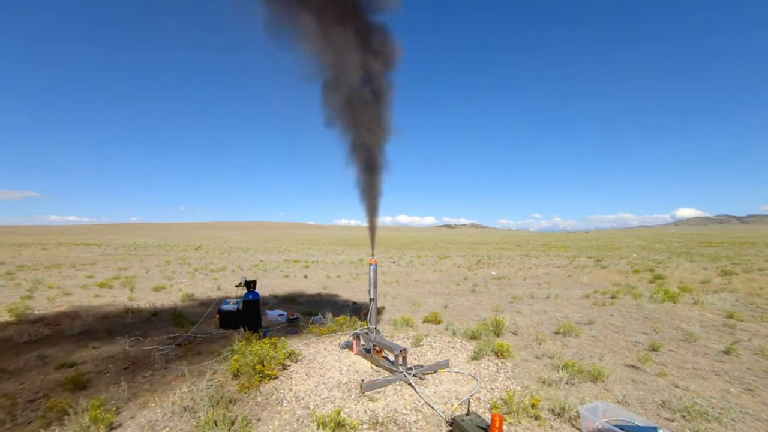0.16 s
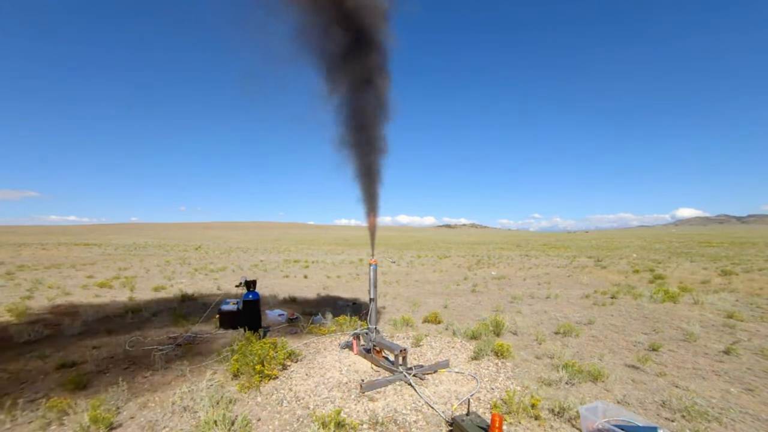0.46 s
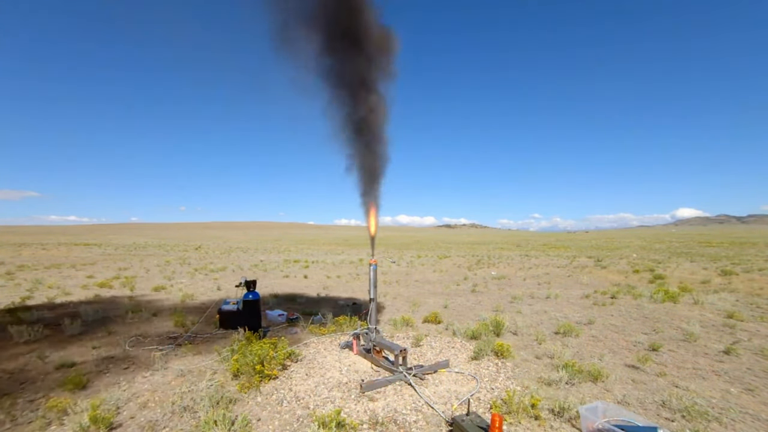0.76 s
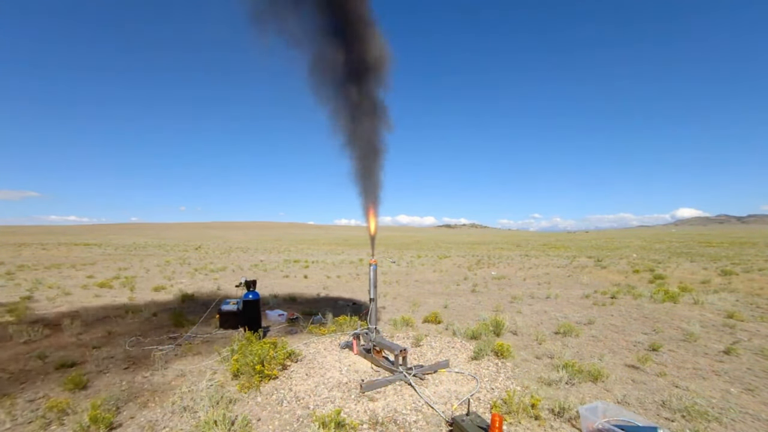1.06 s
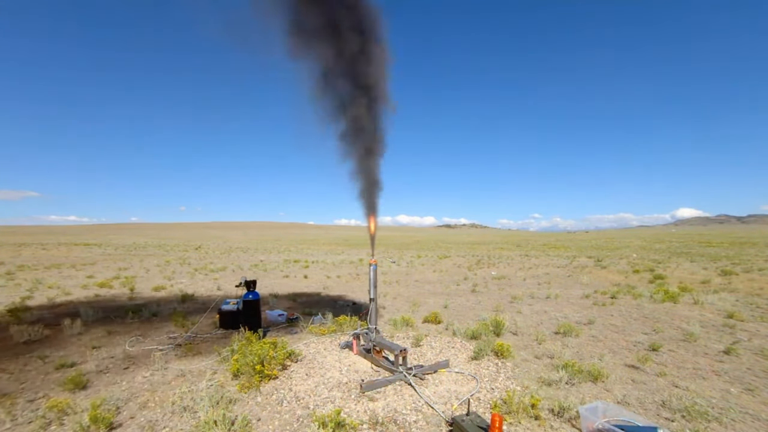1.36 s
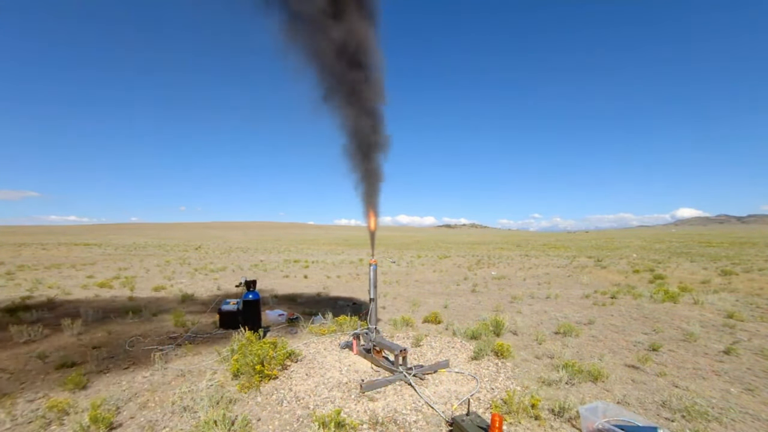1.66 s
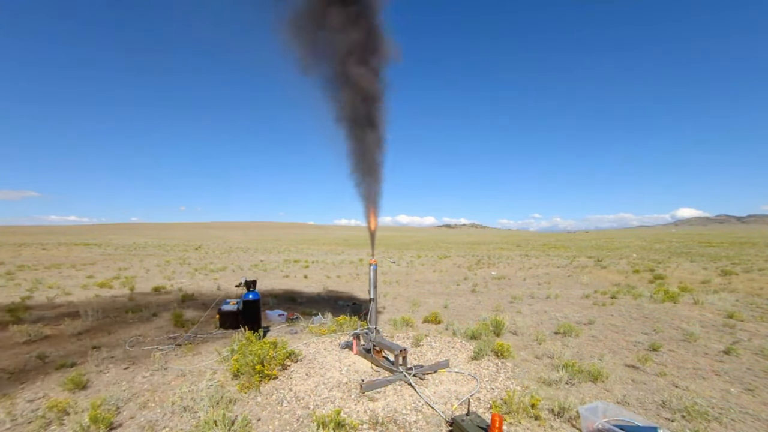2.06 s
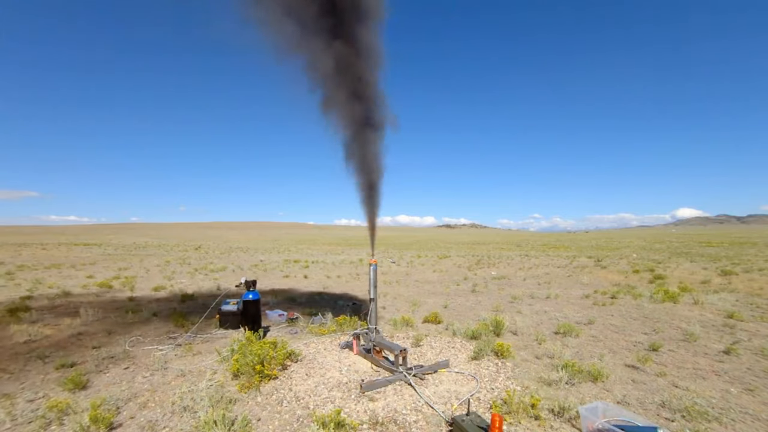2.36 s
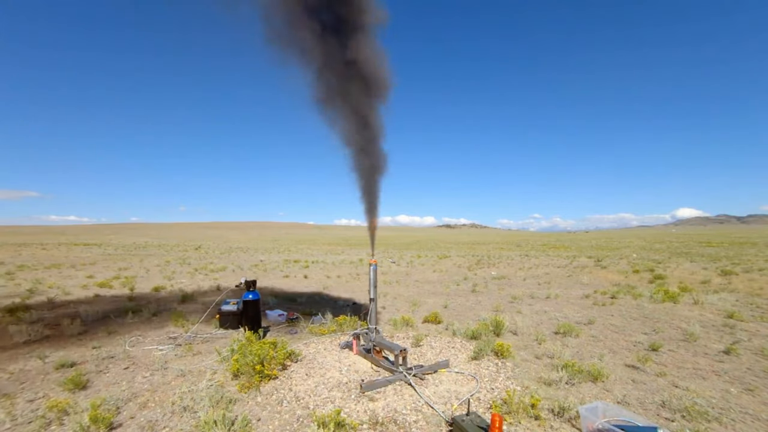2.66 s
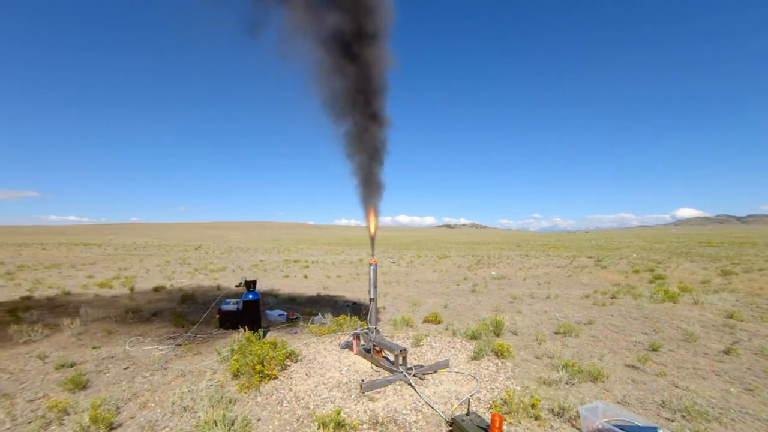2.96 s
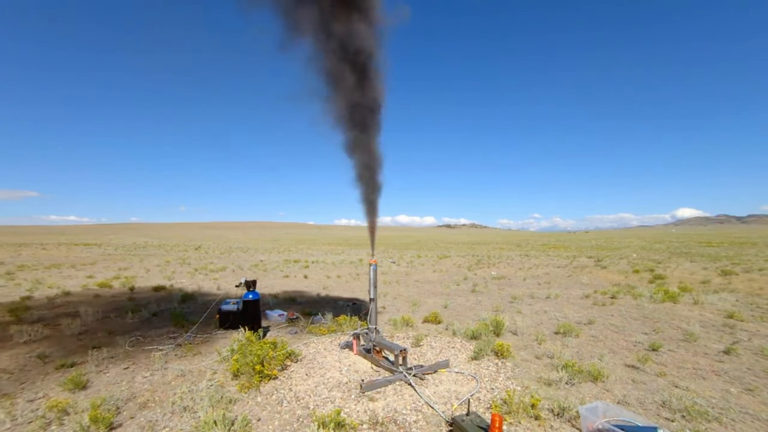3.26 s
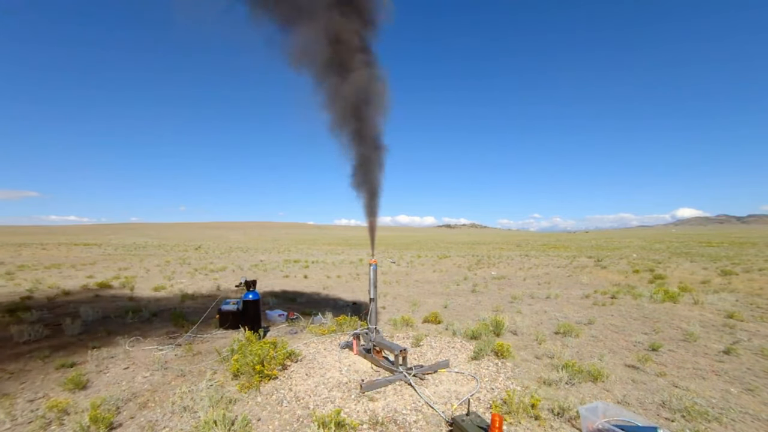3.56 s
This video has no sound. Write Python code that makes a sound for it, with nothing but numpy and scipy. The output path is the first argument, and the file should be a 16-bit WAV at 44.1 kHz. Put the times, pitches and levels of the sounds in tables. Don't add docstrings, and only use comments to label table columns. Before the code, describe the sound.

A small rocket motor sputters alight, then roars steadily with sharp cracks and a gassy hiss.

```python
import sys
import numpy as np
from scipy import signal
from scipy.fft import rfft, irfft, next_fast_len
from scipy.io import wavfile
from scipy.ndimage import uniform_filter1d, minimum_filter1d

SR = 44100
rng = np.random.default_rng(int(sys.argv[2]) if len(sys.argv) > 2 else 0)


def amplitude_ratio(level_db):
    exponent = np.asarray(level_db, float) / 20
    return 10 ** exponent


def store_pcm(level_fs):
    pcm = np.round(np.clip(level_fs, -1, 1) * 32767).astype(np.int16)
    wavfile.write(sys.argv[1], SR, np.atleast_2d(pcm).T)


N = 164052

# time in seconds, roar level in dB, sputter depth in dB, hiss level in dB.
BURN = [(0, -19.5, 8, -31), (0.031, -20.5, 9, -30.5), (0.044, -12.5, 4, -30), (.1, -16, 11, -23.5),
        (.155, -13, 10.5, -22.5), (0.172, -12.5, -7, -31.5), (.225, -14, -5, -26), (.26, -12.5, 1.5, -31),
        (.5, -13, 4, -33.5), (1.0, -13, 0, -30), (1.2, -12.5, 1, -29.5), (2.0, -12.5, 2.5, -30.5),
        (2.8, -13, 4, -29.5), (3.1, -13.5, -1, -32.5), (3.4, -13.5, 3, -30), (3.72, -13.5, 4.5, -28.5)]
# start in seconds, length in seconds, roar change in dB.
LULLS = [(.008, 0.017, -10), (.033, 0.0058, -46), (0.048, .1145, -17), (0.177, 0.0082, -22),
         (0.187, 0.042, -21.5), (0.231, .008, -19), (0.251, .006, -17), (.262, 0.016, -12),
         (.294, 0.0079, -20), (0.319, .007, -7), (0.347, 0.0099, -9), (0.36, 0.01, -14), (0.368, 0.015, -2),
         (0.401, 0.0065, -19), (0.427, 0.0038, 2), (0.449, 0.012, -21), (0.587, 0.0054, -10),
         (0.605, 0.0076, -28), (0.668, 0.012, -9), (.882, 0.0094, -18), (1.232, 0.0072, -11),
         (1.566, .006, -12), (1.677, .008, -8), (1.781, 0.0073, -13), (1.92, .007, -13),
         (2.246, 0.0082, -7), (2.297, 0.0083, -12), (2.42, 0.007, -7), (2.540, 0.0064, -18),
         (2.735, .007, -12), (2.984, 0.0098, -15), (3.053, 0.0048, 0), (3.092, 0.015, -14.5),
         (3.205, 0.015, -7), (3.282, 0.0073, -16), (3.402, 0.011, -13.5), (3.428, 0.0162, -7),
         (3.462, 0.0085, -5), (3.522, .010, -12), (3.557, 0.013, -7), (3.577, 0.017, -16),
         (3.612, 0.0091, -21), (3.629, 0.0067, -16), (3.654, 0.013, -19), (3.668, 0.0168, -13.5),
         (3.698, 0.0043, -21), (3.711, 0.011, -16)]
# time in seconds, peak in dB.
CRACKS = [(0.002, -18), (0.027, -8), (0.041, -6.5), (0.043, -4.5), (0.046, -12), (0.16, -4), (0.163, -2),
          (0.168, -7), (0.171, -8), (0.175, -10), (0.185, -11), (0.227, -4.5), (0.243, -11), (0.244, -5),
          (0.257, 1), (0.275, -5.5), (0.283, -3), (0.306, -4), (0.33, -2), (0.345, -3), (0.355, -8),
          (0.386, -3), (0.409, -4), (0.427, -5), (0.463, -6), (0.473, 2), (0.59, -4), (1.187, -7),
          (1.573, -5), (1.836, -4), (1.925, -8), (2.314, -2), (2.568, -5), (2.608, -1), (2.819, -12),
          (3.053, -3), (3.294, -4), (3.424, -5), (3.45, -7), (3.516, -6), (3.568, -1), (3.593, -0.5),
          (3.622, -9), (3.637, -6), (3.689, -3.5), (3.705, 0), (3.715, -4)]
# frequency in Hz, density in dB per Hz.
ROAR_SPECTRUM = [(70, -8), (190, -9.5), (330, -1), (900, -14.5), (2000, -20), (3250, -23.5), (3700, -37),
                 (16000, -91)]
# frequency in Hz, density in dB per Hz.
JET_SPECTRUM = [(100, -23.5), (500, -6.5), (3000, 0), (3600, -6.5), (8200, -14.5), (10400, -20),
                (10700, -26), (16000, -40.5)]
# centre in Hz, width in Hz, gain in dB.
HOUSING = [(387, 740, 3.5), (608, 140, -6), (749, 280, 7), (965, 156, -4), (1968, 244, 4.5),
           (2170, 150, -6), (2570, 45, -17), (2960, 100, -4), (3447, 240, -13), (4016, 160, -13),
           (4320, 100, -9), (5020, 340, -7), (6110, 200, -23), (12860, 530, 8.5)]
# centre in Hz, width in Hz, gain in dB.
CRACK_BODY = [(300, 270, 5.4), (700, 250, 1.7)]
# start in seconds, length in seconds, strength from 0 to 1.
SWIRLS = [(0, .09, .45), (.19, .04, .6), (.27, .05, .65), (.39, .07, .5), (.61, .46, .75), (1.22, .05, .3),
          (1.5, .2, .5), (1.99, .08, .4), (2.08, .11, .45), (2.32, .16, .5), (2.82, .15, .55),
          (3.09, .39, .6), (3.51, .06, .95), (3.58, .14, .5)]
# start in seconds, length in seconds, low edge in Hz, high edge in Hz.
OPPOSED = [(.4, .045, 4900, 5400), (.395, .03, 6300, 7700), (.52, .08, 6300, 7200), (.62, .11, 4800, 5600),
           (.77, .1, 4900, 5600), (1.22, .04, 6300, 7300), (1.995, .09, 6200, 8500),
           (2.35, .09, 5100, 5700), (2.68, .05, 8500, 9600), (3.0, .05, 5200, 6200),
           (3.5, .05, 9000, 12000)]

DIE_S, CATCH_S = 0.0025, 0.001
RELIGHT_S, RELIGHT_DB = 0.003, 1.5
SWIRL_FROM_HZ, SWIRL_BAND_HZ = 4600, 345
ALWAYS_LOW_HZ, ALWAYS_HIGH_HZ = 10200, 12750


def rms_one(x):
    return x / np.sqrt(np.mean(x ** 2) + 1e-20)


def drift(rate_hz):
    pole = np.exp(-16 * np.pi * rate_hz / SR)
    noise = rng.standard_normal(N // 8 + 4002)
    slow = signal.lfilter([1], [1, -2 * pole, pole * pole], noise)[4000:]
    return np.interp(np.arange(N) / 8, np.arange(len(slow)), rms_one(slow))


def spells(rows, rise_s, fall_s):
    t = np.arange(N) / SR
    total = 0
    for start_s, length_s, value in rows:
        flank = np.minimum((t - start_s) / rise_s, (start_s + length_s - t) / fall_s)
        total = total + value * np.clip(flank, 0, 1)
    return total


def colour(x, spectrum, bumps=()):
    size = 2 * next_fast_len(N // 2 + 4096)
    hz = np.arange(size // 2 + 1) * SR / size + 1
    level_db = np.interp(np.log(hz), np.log([row[0] for row in spectrum]), [row[1] for row in spectrum])
    for centre_hz, width_hz, db in bumps:
        level_db = level_db + db / (1 + (2 * (hz - centre_hz) / width_hz) ** 2)
    fold = irfft(level_db * np.log(10) / 20)
    fold[1:size // 2] *= 2
    fold[size // 2 + 1:] = 0
    return irfft(rfft(x, size) * np.exp(rfft(fold)))[..., :N]


def burn(column):
    return np.interp(np.arange(N) / SR, [row[0] for row in BURN], [row[column] for row in BURN])


def combustion():
    pops_per_s, pop_spread_db, pop_share = 2400, 4, 0.66
    fired = rng.random(N) < pops_per_s / SR
    size_db = pop_spread_db * np.minimum(rng.exponential(1, N), 4)
    pops = fired * amplitude_ratio(size_db) * rng.choice([-1, 1], N)
    source = np.sqrt(pop_share) * rms_one(pops) + np.sqrt(1 - pop_share) * rng.standard_normal(N)
    sputter = drift(25) + 0.2 * drift(190)
    return rms_one(source * amplitude_ratio(np.abs(burn(column=2)) * np.minimum(sputter, 0.63)))


def roar():
    steady_s, steady_share = 0.015, 0.53
    source = combustion()
    swell = uniform_filter1d(colour(source, ROAR_SPECTRUM, HOUSING) ** 2, int(steady_s * SR))
    source = source * (swell / swell.mean() + 0.045) ** (-steady_share / 2)
    relights = [(start_s + length_s, 2 * RELIGHT_S, RELIGHT_DB) for start_s, length_s, _ in LULLS]
    relight_db = spells(relights, CATCH_S, RELIGHT_S)
    gate = amplitude_ratio(burn(column=1) + spells(LULLS, DIE_S, CATCH_S) + relight_db)
    ungated = colour(source, ROAR_SPECTRUM, HOUSING)
    out = colour(source * gate, ROAR_SPECTRUM, HOUSING) / np.std(ungated)
    rumble = signal.sosfiltfilt(signal.butter(2, 130, fs=SR, output="sos"), out)
    return out - rumble * spells([(-1, 1.19, 0.9)], 1, 0.034)


def cracks():
    clicks, unit = np.zeros(N), np.zeros(N)
    time_s, peak_db = np.transpose(CRACKS)
    clicks[(time_s * SR).astype(int)] = -amplitude_ratio(peak_db - 6)
    unit[0] = 1
    path = [*HOUSING, *CRACK_BODY]
    return colour(clicks, ROAR_SPECTRUM, path) / np.abs(colour(unit, ROAR_SPECTRUM, path)).max()


def jet():
    patch_db, duck_share = 2, 0.018
    out, shared = 0, drift(28)
    edges_hz = np.r_[60, 1000, 2500, np.geomspace(3400, 19000, 10)]
    white = rng.standard_normal((2, N))
    for k, (low_hz, high_hz) in enumerate(zip(edges_hz, edges_hz[1:])):
        bandpass = signal.butter(2, [low_hz, high_hz], "band", fs=SR, output="sos")
        band = signal.sosfilt(bandpass, white[k % 2])
        out = out + amplitude_ratio(patch_db * (0.35 * shared + drift(12))) * band
    level_db = burn(column=3) + duck_share * spells(LULLS, DIE_S, CATCH_S)
    return amplitude_ratio(level_db) * rms_one(colour(out, JET_SPECTRUM, HOUSING))


def swirl_odds(frame_starts, centre_hz):
    stray_share, upper_share, always_share = 0.17, 0.9, 0.8
    swirl = spells(SWIRLS, 0.01, 0.01)[np.clip(frame_starts, 0, N - 1)]
    reach = np.where(centre_hz > SWIRL_FROM_HZ, 1, stray_share * (centre_hz > 2400))
    reach = reach * np.where(centre_hz > ALWAYS_HIGH_HZ, stray_share, 1)
    reach = reach * np.where(centre_hz > 8700, upper_share, 1)
    always = always_share * (centre_hz > ALWAYS_LOW_HZ) * (centre_hz < ALWAYS_HIGH_HZ)
    return np.maximum(swirl[:, None] * reach, always)


def swirl_draws(shape):
    memory = 0.35
    draw = rng.standard_normal(shape)
    draw = signal.lfilter([np.sqrt(1 - memory ** 2)], [1, -memory], draw, axis=0)
    draw = 0.75 * draw + 0.5 * np.roll(draw, 1, axis=1) + 0.43 * draw[:, :1]
    return 1 / (1 + np.exp(1.7 * draw))


def swim_treble(x):
    hop, lead = 1024, 1568
    half_share, stray_turn, top_hz = 0.4, 0.08, 15780
    window = signal.windows.kaiser_bessel_derived(2 * hop, 4 * np.pi)
    count = N // hop + 3
    at = np.arange(count)[:, None] * hop + np.arange(2 * hop)
    padded = np.r_[np.zeros(lead), x, np.zeros(4 * hop)]
    spec = rfft(padded[at] * window)
    hz = np.arange(hop + 1) * SR / (2 * hop)
    band = (hz / SWIRL_BAND_HZ).astype(int)
    centre_hz = (np.arange(band[-1] + 1) + 0.5) * SWIRL_BAND_HZ

    draw = swirl_draws((count, len(centre_hz)))
    odds = swirl_odds(at[:, hop] - lead, centre_hz)
    quarters = (draw < odds) * 1 + (draw < odds * (1 - half_share))
    quarters = quarters * np.where(centre_hz > SWIRL_FROM_HZ, 1, stray_turn)
    turn = np.pi / 4 * quarters[:, band]
    when_s = (at[:, hop, None] - lead) / SR
    for start_s, length_s, low_hz, high_hz in OPPOSED:
        inside_time = (when_s > start_s) & (when_s < start_s + length_s)
        turn = np.where(inside_time & (hz > low_hz) & (hz < high_hz), np.pi / 2, turn)

    out = np.zeros((2, len(padded)))
    for row, part in zip(out, (np.cos(turn), 1j * np.sin(turn))):
        np.add.at(row, at, irfft(spec * part * (hz < top_hz)) * window)
    mid, side = out[:, lead:lead + N]
    return np.array([mid + side, mid - side])


def limit(x):
    limit_db, release_db_per_s = -2.3, 200
    over_db = np.maximum(20 * np.log10(np.abs(x) + 1e-9) - limit_db, 0)
    ramp_db = release_db_per_s * np.arange(N) / SR
    held_db = np.maximum.accumulate(over_db + ramp_db) - ramp_db
    gain_db = uniform_filter1d(minimum_filter1d(-held_db, size=45), size=45)
    return x * amplitude_ratio(gain_db)


def scene():
    return np.tile(roar() + cracks() + jet(), (2, 1))


def band_limit(x):
    return signal.sosfilt(signal.butter(12, 15950, fs=SR, output="sos"), x)


def record(dry):
    bass_cut = signal.butter(3, 106, "high", fs=SR, output="sos")
    mix = swim_treble(limit(signal.sosfilt(bass_cut, dry[0])))
    return band_limit(mix)


dry = scene()
out = record(dry)
store_pcm(out)
```